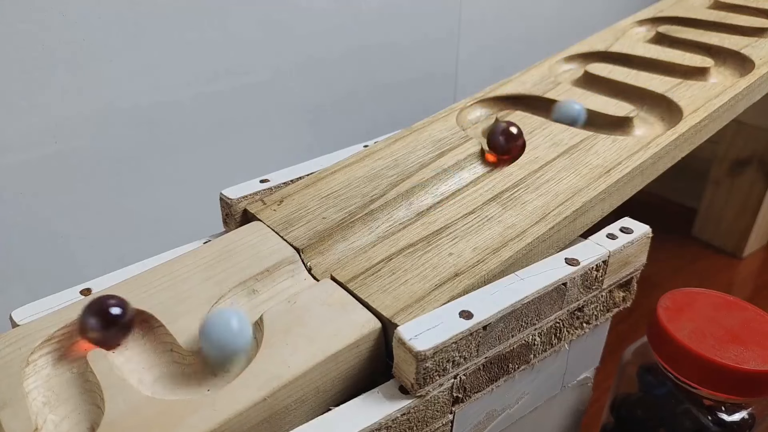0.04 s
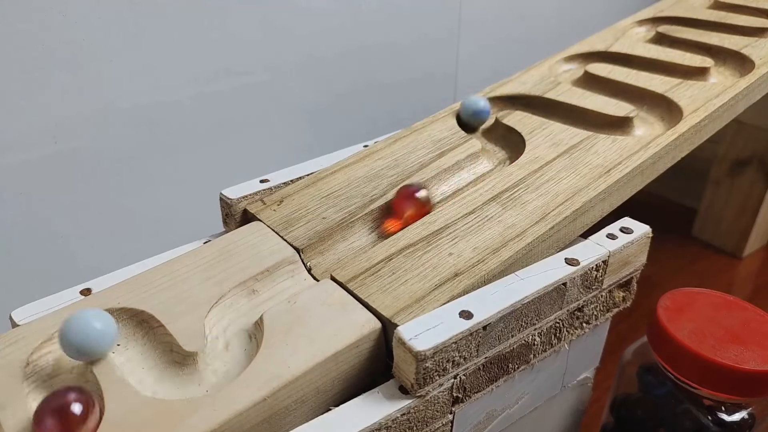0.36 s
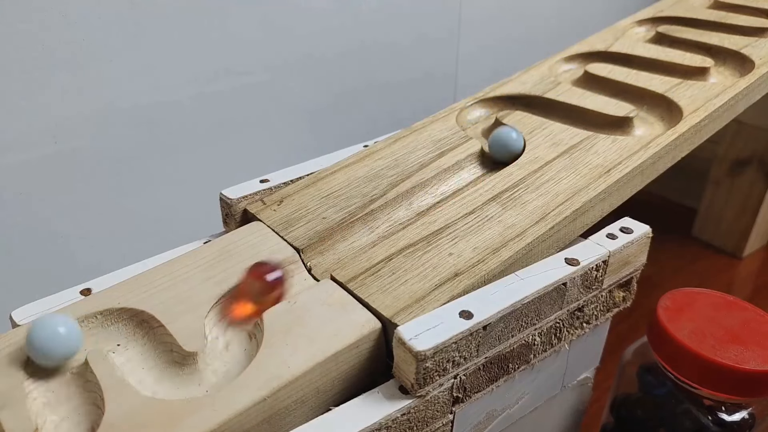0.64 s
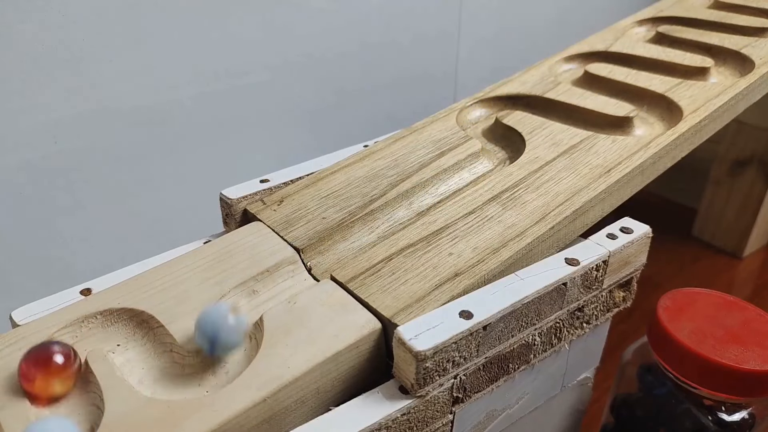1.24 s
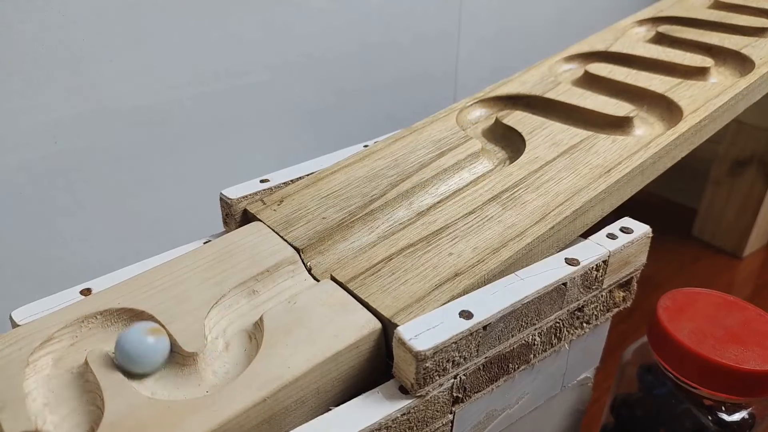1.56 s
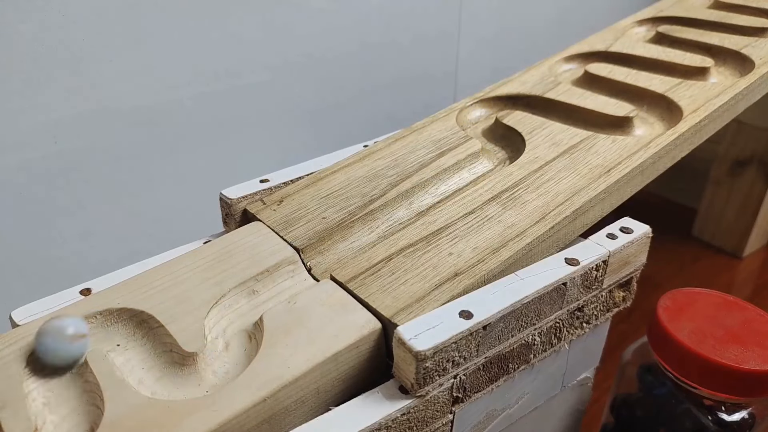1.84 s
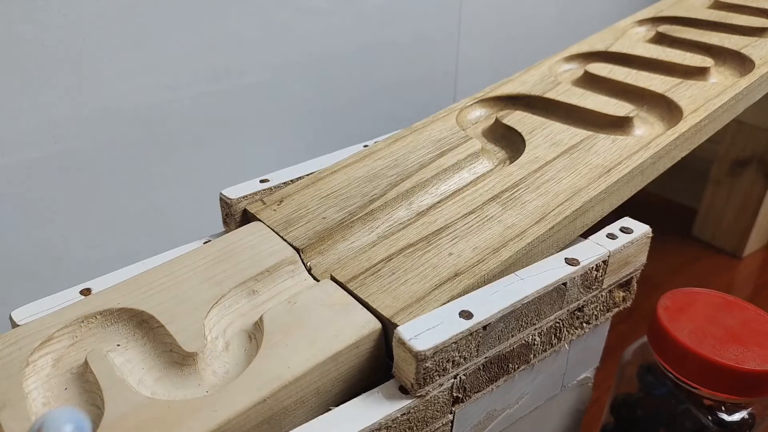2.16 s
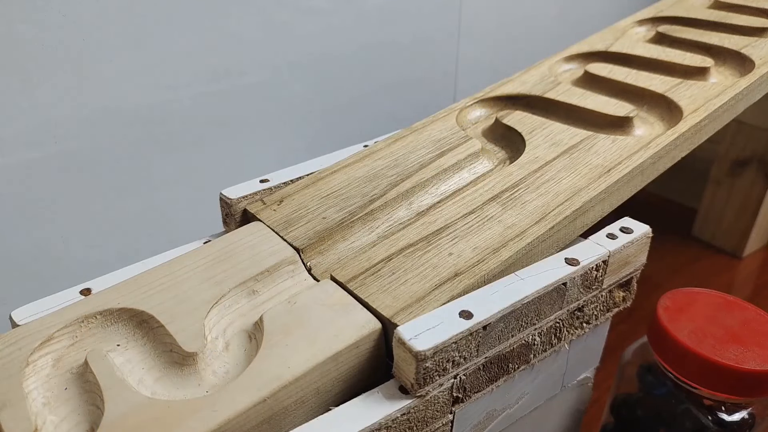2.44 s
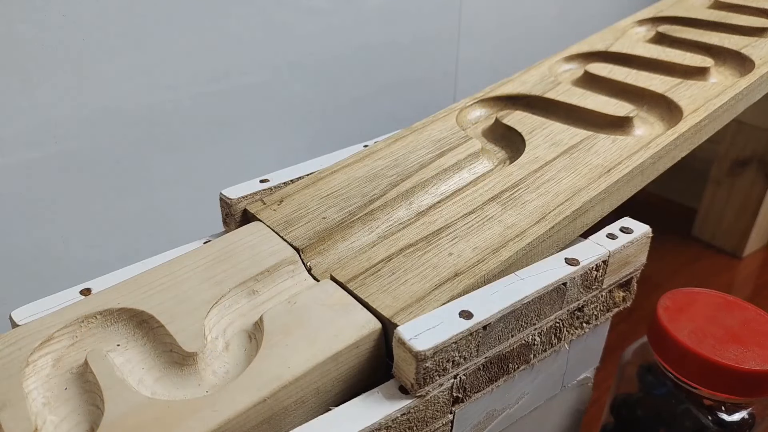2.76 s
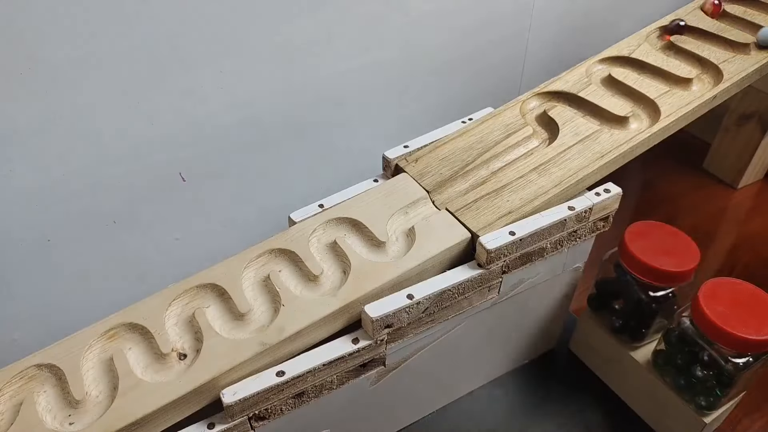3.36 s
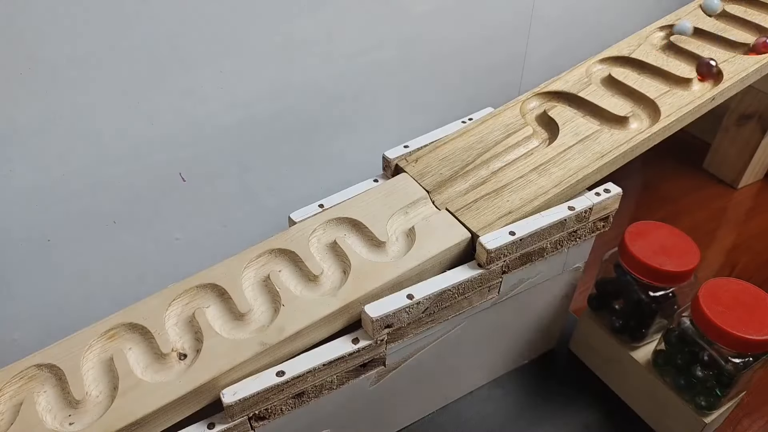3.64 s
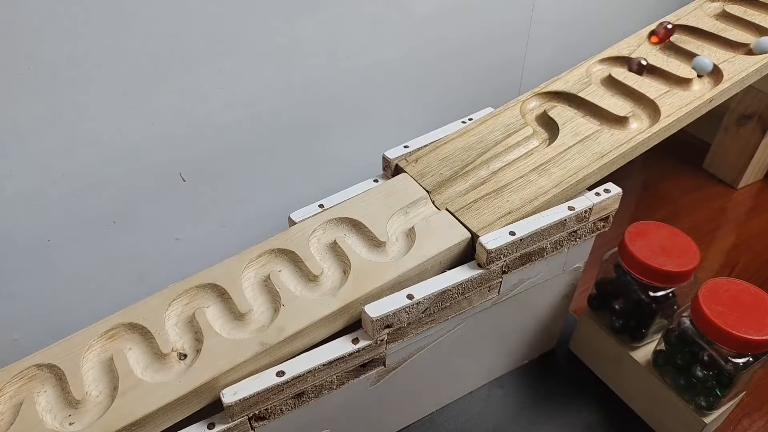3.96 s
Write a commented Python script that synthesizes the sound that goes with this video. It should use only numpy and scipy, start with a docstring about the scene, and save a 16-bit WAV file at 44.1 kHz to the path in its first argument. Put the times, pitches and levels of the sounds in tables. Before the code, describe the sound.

Glass marbles roll close by along wooden grooves, rumbling and rasping with irregular knocks, the sharpest at 0.5 seconds. The rolling fades, two marbles click faintly at 1.8 seconds, and one drops with a hollow plop near 2.4, followed by more knocks. From about 3.1 to 4 seconds, a louder pack rattles densely down the wood with glassy clacks. Faint hum and hiss fill the small room.

```python
"""Marbles in wooden grooves

Glass marbles roll down winding grooves: the grain makes a board rumble and rasp, the bends knock its modes.
The first few pass close by on the lower board and fade; two click together, one drops with a hollow plop.
At 3.07 s the sound switches to a pack rattling down the upper board. A small room rings over hum and hiss.
"""
import sys
import numpy as np
from scipy import signal
from scipy.fft import rfft, irfft
from scipy.io import wavfile

SR = 44100
rng = np.random.default_rng(int(sys.argv[2]) if len(sys.argv) > 2 else 0)


def digitize_waveform(pressure):
    """Quantize a signal to 16-bit integers and store it at the path in sys.argv[1].

    Rows of a 2-D input are taken as channels; values are limited to [-1, 1].
    """
    field = np.atleast_2d(pressure).T
    bounded = np.clip(field, -1, 1)
    quanta = np.round(bounded * 32767).astype(np.int16)
    wavfile.write(sys.argv[1], SR, quanta)


N = 176400

RING_S, STRIKE_SPREAD_DB = 0.3, 1  # length of one tap; scatter of mode levels per knock
STEREO_HZ = 443  # the image narrows below this


def undb(db):
    """Decibels to gain."""
    return 10 ** (np.asarray(db) / 20)


def unit(x):
    """Scale to a mean energy of 1 per channel."""
    return x / np.sqrt(np.mean(np.sum(x ** 2, axis=-1)))


def level(x, db):
    """Scale the non-silent part to an rms level, steady or moving."""
    return x * undb(db) / np.sqrt(np.mean(x[np.abs(x) > 1e-9] ** 2))


def curve(rows, column=1):
    """One table column, interpolated over time."""
    rows = np.array(rows)
    return np.interp(np.arange(N) / SR, rows[:, 0], rows[:, column])


def cut(x, hz, kind="low", order=4):
    """Butterworth low- or high-pass."""
    return signal.sosfilt(signal.butter(order, min(hz, SR / 2 - 1), kind, fs=SR, output="sos"), x)


def pan(db):
    """Stereo gains for a left-minus-right level."""
    return undb(np.array([[db], [-db]]) / 2)


def add(out, start_s, hit, db, window_s=0.02):
    """Mix in a hit with the energy of rms level db held for window_s."""
    i = int(start_s * SR)
    hit = unit(hit)[:, :max(N - i, 0)]
    out[:, i:i + hit.shape[1]] += hit * undb(db) * np.sqrt(window_s * SR)


def noise(spectrum, size):
    """Stereo noise of a given spectrum, narrower in the bass."""
    hz = np.fft.rfftfreq(size, 1 / SR) + 1
    points_hz, points_db = np.array(spectrum).T
    gain = undb(np.interp(np.log(hz), np.log(points_hz), points_db))
    mid, side = rfft(rng.standard_normal((2, size)))
    width = np.clip(hz / STEREO_HZ, 0.4, 1)
    return irfft((mid + width * side * np.array([[1], [-1]])) * gain, size)


def decay(t60_s):
    """Exponential decay, RING_S long."""
    return np.exp(-np.log(1000) * np.arange(int(RING_S * SR)) / SR / t60_s)


def swell(x, tau_s):
    """Apply an exponential attack."""
    return x * (1 - np.exp(-np.arange(x.shape[1]) / SR / tau_s))


def burst(spectrum, t60_s):
    """Decaying noise of a given spectrum."""
    envelope = decay(t60_s)
    return unit(noise(spectrum, len(envelope)) * envelope)


def ring(modes, spread_db, detune=0.0066, rise_s=0.00038):
    """Decaying modes; the place of the blow sets their shares, the marble's weight detunes them."""
    t, out = np.arange(int(RING_S * SR)) / SR, 0
    for k, (hz, db, t60_s) in enumerate(modes):
        share, polarity, shift = rng.standard_normal(3)
        # neighbouring modes reach opposite ears first
        lead_rad = (-1) ** k * min(hz / STEREO_HZ / 2, 1) * np.pi / 4 * np.array([[1], [-1]])
        tone = np.sin(2 * np.pi * hz * (1 + detune * shift) * t + lead_rad)
        out = out + np.sign(polarity) * undb(db + spread_db * share) * unit(tone * decay(t60_s))
    return out * np.sin(np.pi / 2 * np.minimum(t / rise_s, 1)) ** 2


def favour(modes, hz, boost_db=9, width_oct=0.075):
    """The place of a blow brings out the modes nearest one pitch."""
    modes = np.array(modes)
    if hz:
        modes[:, 1] += boost_db * np.exp(-(np.log2(modes[:, 0] / hz) / width_oct) ** 2)
    return modes


def pack_share(switch_s=3.072, fade_s=0.022):
    """Crossfade: 0 for the first marbles, 1 for the pack."""
    return np.clip((np.arange(N) / SR - switch_s) / fade_s + 0.5, 0, 1)


def background(hum_hz=60.2):
    """Room rumble, hiss and mains hum."""
    # room noise (frequency [Hz], density [dB])
    air = [(25, -12), (45, 1), (75, 5.5), (130, -1.5), (300, -6), (700, -8), (1500, -19.5), (3000, -34.5),
           (5000, -35.5), (8800, -37.5), (9800, -60.5), (15000, -88.5)]
    hum = np.sin(2 * np.pi * hum_hz * np.arange(N) / SR)
    return level(noise(air, N), db=-39) + level(hum, db=-46.5)


def room(x, wet_db=-10, low_t60_s=0.47, high_t60_s=0.19, split_hz=2500, rise_s=0.005):
    """Add a small room's diffuse tail, shorter in the treble."""
    t = np.arange(SR) / SR
    reflections = rng.standard_normal((2, SR))
    low = cut(reflections, split_hz, order=2) * undb(-60 * t / low_t60_s)
    high = cut(reflections, split_hz, "high", order=2) * undb(-60 * t / high_t60_s)
    tail = unit((low - high) * np.clip(t / rise_s - 0.5, 0, 1))
    return x + undb(wet_db) * signal.fftconvolve(x, tail, axes=1)[:, :N]


def lower_board(spread_db, favoured_hz=None, body_db=2.5):
    """One tap: modes, plus a dense ring that builds as the blow spreads through the wood."""
    # board modes (frequency [Hz], energy [dB], t60 [s])
    modes = [(145, -16.5, 0.15), (224.7, -8.5, 0.13), (321, -12, 0.082), (390.4, -8, 0.076),
             (528.6, -9.5, 0.087), (642, -13, 0.082), (777.6, -5.5, 0.11), (856, -6, 0.089),
             (939.6, -4, 0.071), (1107, -4.5, 0.034), (1335, -2, 0.065), (1533, -6.5, 0.1),
             (1709, -1.5, 0.066), (2139, -5.5, 0.05), (2330, -8, 0.051)]
    # dense ring (frequency [Hz], density [dB])
    body_spectrum = [(60, -32.5), (150, -5), (400, -0.5), (900, -3), (1800, -0.5), (2500, -0.5),
                     (3200, -9.5), (6000, -30.5), (15000, -31)]
    body = unit(swell(burst(body_spectrum, t60_s=0.054), tau_s=0.0015))
    return ring(favour(modes, favoured_hz), spread_db) + undb(body_db) * body


def upper_board(spread_db, favoured_hz=None, body_db=4):
    """One tap: modes, plus a short dense ring."""
    # board modes (frequency [Hz], energy [dB], t60 [s])
    modes = [(323, -5, .14), (452, -10.5, .1), (628, -6, .15), (785, -6.5, .08), (1151, -3, .07),
             (1355, -3, .05), (1636, -3, .09), (1780, 1.5, .06), (2186, -3, .085), (2555, -8, .045),
             (2805, -13, .22), (3180, -9, .06)]
    # dense ring (frequency [Hz], density [dB])
    body_spectrum = [(60, -34), (200, -27), (400, 0), (950, -1.5), (1900, 4.5), (3200, -13.5), (4200, -18),
                     (5500, -27), (8500, -25), (11000, -33), (15000, -54)]
    tones = ring(favour(modes, favoured_hz), spread_db)
    return tones + undb(body_db) * burst(body_spectrum, t60_s=0.042)


def grit(spread_db):
    """One tiny crackle of glass on grain, its colour varying with place."""
    # crackle (frequency [Hz], density [dB])
    spectrum = [(1500, -9), (2800, 5.5), (5500, 5), (8000, -6.5), (11000, -29), (15000, -37.5)]
    return burst([(hz, db + spread_db * rng.standard_normal()) for hz, db in spectrum], t60_s=0.021)


def roll(tap, bumps_per_s, spread_db, span_s, place_s=0.05, place_spread_db=2.5):
    """Random bumps over the grain; each new place on the board rings in its own way."""
    bumps = rng.random(N) < bumps_per_s / SR
    bumps = bumps * undb(spread_db * np.clip(rng.standard_normal(N), -2, 2))
    bumps *= rng.choice([-1, 1], N)
    out, size = np.full((2, 2 * N), 1e-18), int(place_s * SR)
    for i in range(int(span_s[0] * SR), min(int(span_s[1] * SR), N), size):
        rung = signal.fftconvolve(bumps[None, i:i + size], unit(tap(place_spread_db)), axes=1)
        out[:, i:i + rung.shape[1]] += rung
    return cut(out[:, :N], 74, "high", order=2)


def first_roll(span_s=(0, 3.1), rumble_trim_db=3.5, rasp_trim_db=0.5, grit_re_rasp_db=-28.5):
    """Rumble, rasp and grit of the first marbles in the lower groove."""
    # rolling levels before trim (time [s], rumble [dB], rasp [dB])
    levels = [(0.0, -29, -19), (0.14, -36.5, -28.5), (0.29, -36.5, -29.5), (0.67, -42, -32.5),
              (0.8, -38.5, -33.5), (0.91, -41.5, -42), (1.33, -42.5, -47.5), (1.59, -48, -50.5),
              (1.93, -40, -40.5), (2.18, -54, -53), (2.39, -46, -74), (2.71, -45, -36.5), (2.91, -42, -40),
              (3.07, -62, -52)]
    rumble_db = curve(levels, column=1) + rumble_trim_db
    rasp_db = curve(levels, column=2) + rasp_trim_db
    rumble = cut(roll(lower_board, bumps_per_s=980, spread_db=6, span_s=span_s), 449)
    rasp = roll(lower_board, bumps_per_s=980, spread_db=6, span_s=span_s)
    rasp = cut(cut(rasp, 1147, order=3), 500, "high", order=2)
    crackle = roll(grit, bumps_per_s=2100, spread_db=1, span_s=span_s)
    out = level(rumble, rumble_db) + level(rasp, rasp_db) + level(crackle, rasp_db + grit_re_rasp_db)
    return out * pan(-1.5) * (1 - pack_share())


def click():
    """Two marbles meet, glass on glass."""
    # click (frequency [Hz], density [dB])
    spectrum = [(1500, -2), (3300, -7), (4400, -1), (5600, 0), (6500, -5), (9000, -21)]
    out = np.zeros((2, N))
    hit = cut(cut(burst(spectrum, t60_s=0.025), 6500), 3300, "high", order=2)
    add(out, start_s=1.822, hit=hit, db=-37)
    return out


def plop(contact_hz=1330):
    """One marble drops with a hollow ring."""
    # hollow modes (frequency [Hz], energy [dB], t60 [s])
    modes = [(557, -16, 0.04), (706, 1, 0.061), (786, -1, 0.054), (1185, -8.5, 0.076)]
    out = np.zeros((2, N))
    hit = cut(ring(modes, spread_db=0), contact_hz) * pan(1.7)
    add(out, start_s=2.351, hit=hit, db=-19.5)
    return out


def knocks(thump_hz=650, tau_at_1khz_s=0.0035):
    """Marbles hit the lower board's bends: harder is brighter, with overload crackle on the loudest."""
    # knocks (time [s], level [dB], contact cut-off [Hz], favoured pitch [Hz],
    #         thump shelf [dB], tick re wood [dB], L-R [dB])
    hits = [(0.02, -24.5, 1500, 950, 1, -26, -17), (.031, -25.5, 1700, 1100, 2, -30.5, -6.5),
            (.059, -21, 1390, 902, -5.5, -38, -5), (.095, -16, 1340, 880, -9.5, -36, -1.5),
            (.114, -15.5, 1390, 835, -4, -34, -2), (0.129, -21, 1105, 814, 5, -36, -3.5),
            (.201, -23.5, 1380, 940, -2, -38, -1), (.273, -25.5, 1510, 860, -2, -38, -11),
            (0.442, -28, 1460, 1010, 14, -33, -3), (0.5164, -11.5, 2400, 1710, -13, -30.5, -6),
            (.634, -22.5, 1520, 1100, -2, -32, -6.5), (.661, -26, 1980, 1510, -11, -33, -1.5),
            (.676, -25.5, 1900, 1330, -8, -38, -4.5), (0.765, -29.5, 1310, 870, -15, -43, -18),
            (.780, -26, 1780, 1100, 3, -29.5, -3), (.949, -27, 1260, 1060, -6, -41, -7),
            (1.087, -34.5, 990, 895, 6.5, -39, -3), (1.109, -21, 1250, 1340, 6.5, -28, -1),
            (1.201, -24, 1950, 1670, -12, -27.5, -9), (1.213, -23.5, 1900, 1570, -9, -34, 1),
            (1.224, -23, 1920, 1420, 5.5, -35, -4.5), (1.349, -17.5, 2660, 2130, -1.5, -23.5, -1),
            (1.425, -25, 1080, 884, 10, -39, -6), (1.533, -32, 1390, 1290, -1, -41, 0.5),
            (1.65, -38.5, 1320, 1300, 1, -37, 0), (1.732, -22.5, 1880, 1350, -10, -35, -4),
            (1.782, -28, 950, 900, -2, -39, -2), (2.026, -37, 1380, 1380, -11, -40, -4),
            (2.245, -44, 1400, 1340, -4, -34, -1), (2.320, -26, 1590, 1340, 4, -38, -3),
            (2.400, -35, 1230, 1350, -15, -48, -1), (2.542, -37.5, 900, 804, -2, -38, -14),
            (2.600, -36.5, 900, 850, 6, -42, -11), (2.681, -20, 1790, 1380, 1.5, -43, -5),
            (2.786, -24.5, 1450, 1370, 5, -36, -3.5), (2.854, -25.5, 1980, 1660, -6, -32, -2.5),
            (2.983, -34.5, 1210, 950, -2, -44, -10), (3.004, -34, 1400, 1340, 4, -38, 1)]
    # glass contact tick (frequency [Hz], density [dB])
    tick_spectrum = [(1000, -7), (3000, 6.5), (5300, 8.5), (7000, -11), (11000, -25), (15000, -26)]
    # brief overload crackle on the loudest knocks (time [s], level [dB])
    overload_bursts = [(0.098, -45), (0.5171, -37), (1.348, -57)]
    # overload crackle (frequency [Hz], density [dB])
    overload_spectrum = [(2000, 3.5), (3300, 4), (6000, -19.5), (10500, -26), (15000, -33)]
    out = np.zeros((2, N))
    for start_s, db, contact_hz, favoured_hz, thump_db, tick_db, pan_db in hits:
        wood = cut(lower_board(STRIKE_SPREAD_DB, favoured_hz, body_db=-4), contact_hz)
        wood = swell(wood, tau_at_1khz_s * (1000 / contact_hz) ** 2)  # glancing knocks build slowly
        wood = wood + (undb(thump_db) - 1) * cut(wood, thump_hz, order=1)
        tick = undb(tick_db) * burst(tick_spectrum, t60_s=0.033)
        add(out, start_s, (unit(wood) + tick) * pan(pan_db), db)
    for start_s, db in overload_bursts:
        add(out, start_s, burst(overload_spectrum, t60_s=0.0079), db)
    return out


def pack_roll():
    """Many marbles roll down the upper board; the frame booms beneath."""
    # rolling level (time [s], level [dB])
    levels = [(3.07, -24), (3.15, -21.5), (3.21, -18), (3.25, -22.5), (3.3, -22), (3.35, -22), (3.42, -18),
              (3.55, -23.5), (3.67, -24), (3.75, -18.5), (3.84, -24), (3.915, -26), (4.0, -20)]
    # frame boom (frequency [Hz], density [dB])
    frame_spectrum = [(30, -30), (60, -11), (100, 26), (160, 6), (250, -4), (450, -23)]
    rattle = roll(upper_board, bumps_per_s=700, spread_db=2, span_s=(3.0, 4.0))
    boom = cut(noise(frame_spectrum, N), 550)
    return (level(rattle, curve(levels)) + level(boom, db=-38)) * pack_share()


def pack_clatter(bounces=3, step_db=-4, mean_gap_s=0.005, contact_hz=3500):
    """Each hard knock on the upper board clacks and chatters on in weaker bounces."""
    # knocks (time [s], level of all bounces [dB], favoured pitch [Hz], clack re wood [dB])
    hits = [(3.076, -29, 1636, -10), (3.112, -23.5, 1151, -10), (3.147, -21.5, 628, -17),
            (3.181, -22.5, 2186, -7), (3.200, -14.5, 2805, -7), (3.258, -14.5, 2186, -4),
            (3.302, -17, 1151, -13), (3.326, -19, 1636, -26), (3.361, -16.5, 1785, -10.5),
            (3.383, -13.5, 1636, -12.5), (3.413, -15.5, 1785, -14), (3.432, -18, 1355, -7),
            (3.460, -18, 3180, -11), (3.485, -22, 1355, -25), (3.503, -20.5, 1151, -18),
            (3.598, -24.5, 1785, -10), (3.620, -19.5, 1355, -32), (3.690, -22.5, 1785, -13),
            (3.720, -18, 2186, -20), (3.731, -18, 1785, -27), (3.753, -18, 1636, -17),
            (3.781, -22, 323, -24), (3.811, -18.5, 1785, -24), (3.851, -21, 1785, -27),
            (3.922, -17.5, 1785, -19), (3.938, -17.5, 1785, -28), (3.974, -17, 1785, -23),
            (3.986, -18.5, 1355, -24)]
    # glass clack (frequency [Hz], density [dB])
    clack_spectrum = [(1200, -30), (2400, 7.5), (3200, 5), (4400, -5), (5500, -19), (8000, -18),
                      (11000, -37), (15000, -38)]
    bounce_db = step_db * np.arange(bounces)
    bounce_db = bounce_db - 10 * np.log10(np.sum(undb(bounce_db) ** 2))  # energies sum to 1
    gaps_s = mean_gap_s * (0.5 + rng.random(len(hits)))
    out = np.zeros((2, N))
    for (start_s, db, favoured_hz, clack_db), gap_s in zip(hits, gaps_s):
        for k in range(bounces):
            wood = cut(upper_board(STRIKE_SPREAD_DB, favoured_hz), contact_hz, order=1)
            wood = cut(wood, 337, "high", order=1)
            clack = undb(clack_db) * burst(clack_spectrum, t60_s=0.065)
            add(out, start_s + k * gap_s, unit(wood) + clack, db + bounce_db[k])
    return out


def scene():
    """Both runs of marbles in the room."""
    first_run = first_roll() + knocks() + click() + plop()
    pack_run = (pack_roll() + pack_clatter()) * pan(-0.5)
    return room(first_run + pack_run) + background()


def record(dry, low_cut_hz=31, top_hz=15400):
    """High-pass, clip at full scale, steep low-pass."""
    clipped = np.clip(cut(dry, low_cut_hz, "high"), -1, 1)
    return signal.sosfilt(signal.ellip(8, 0.2, 70, top_hz, fs=SR, output="sos"), clipped)


dry = scene()
out = record(dry)
digitize_waveform(out)
```